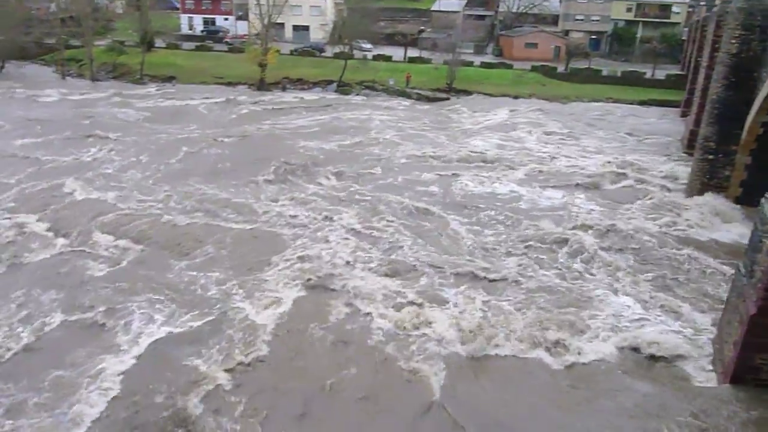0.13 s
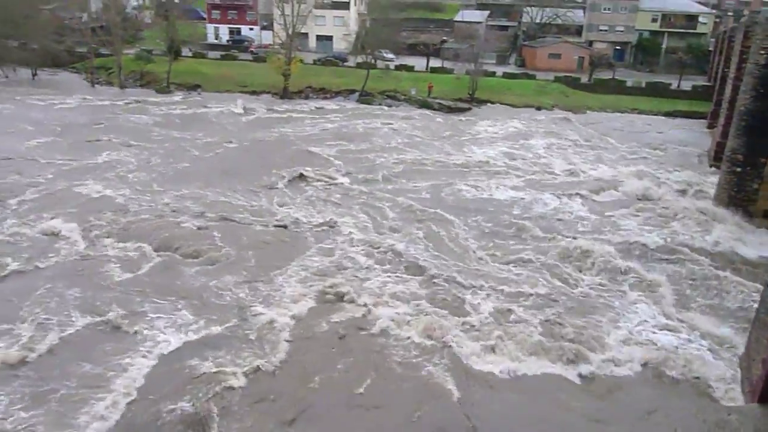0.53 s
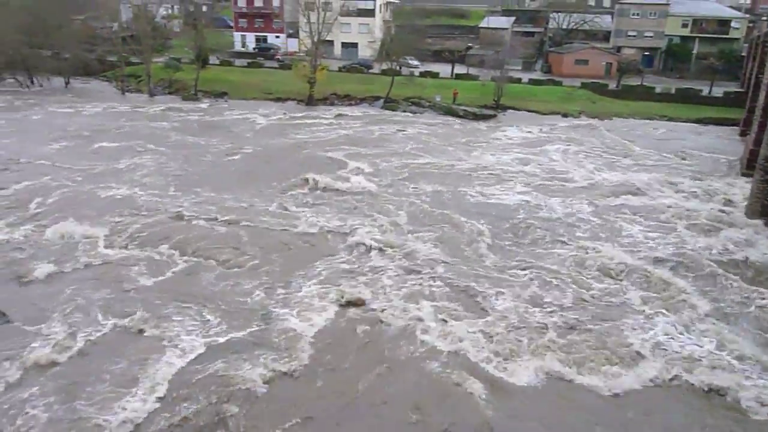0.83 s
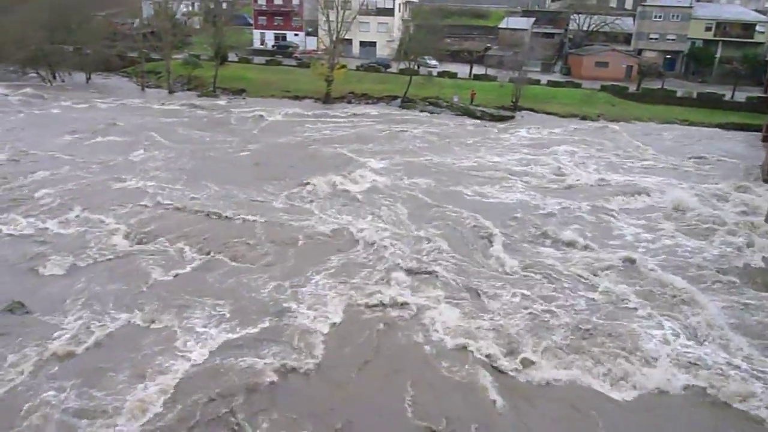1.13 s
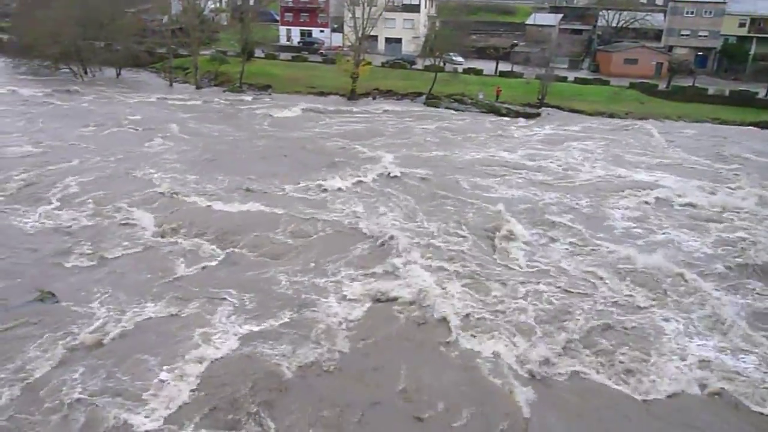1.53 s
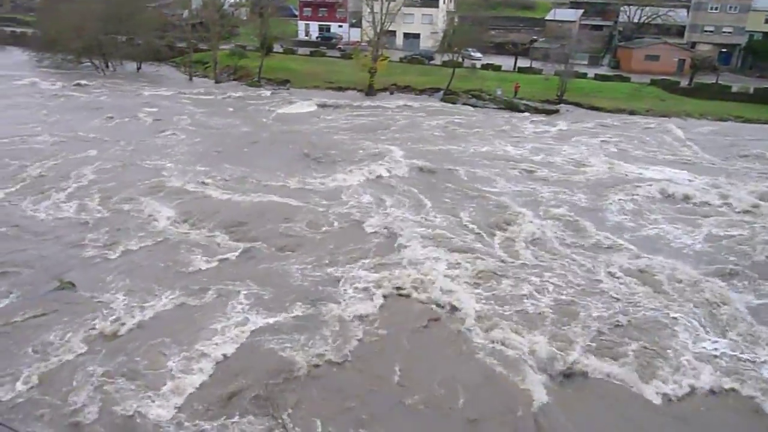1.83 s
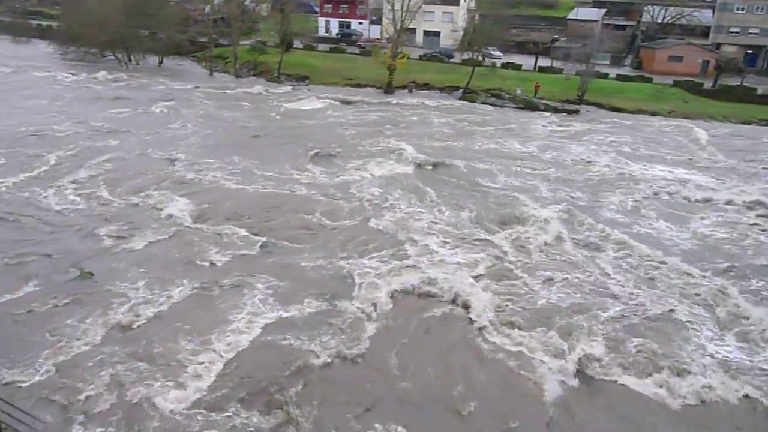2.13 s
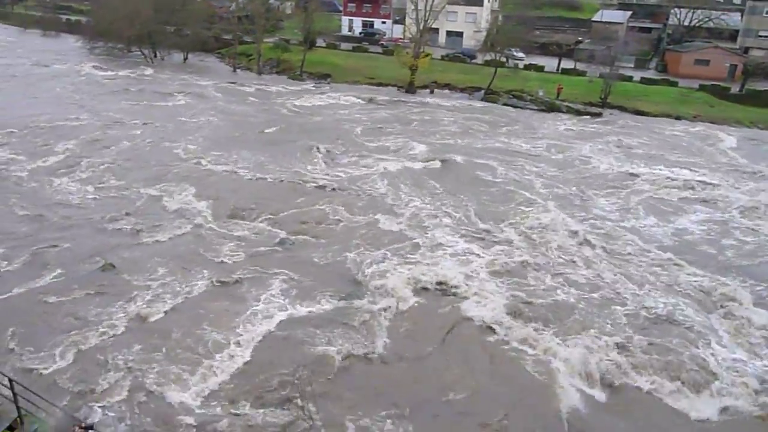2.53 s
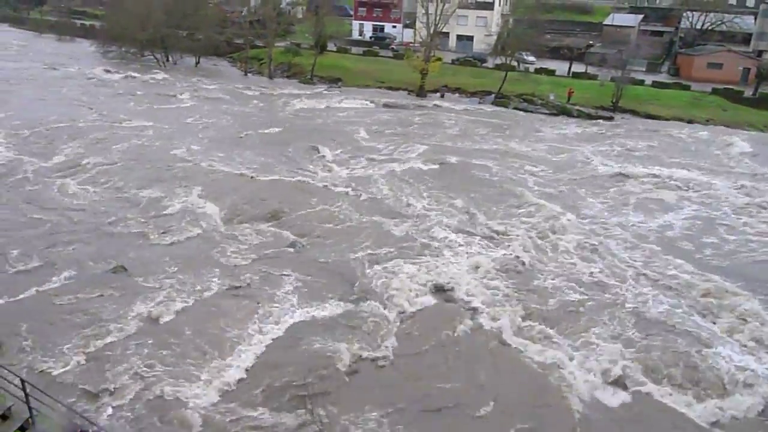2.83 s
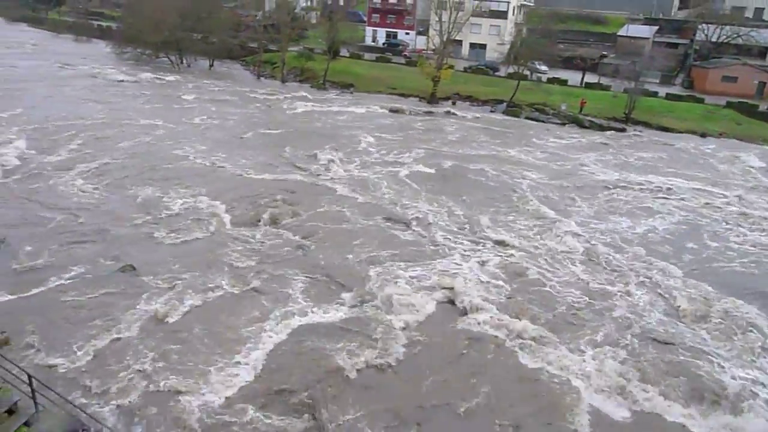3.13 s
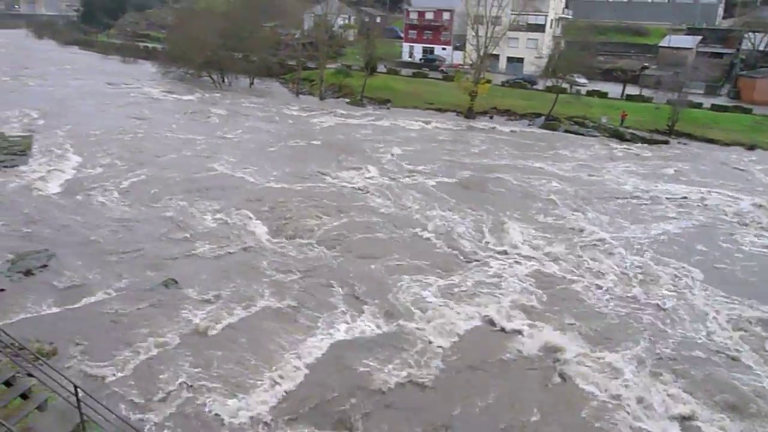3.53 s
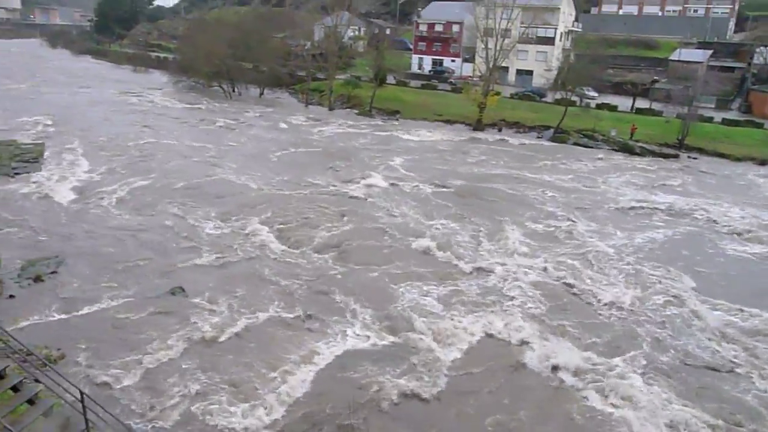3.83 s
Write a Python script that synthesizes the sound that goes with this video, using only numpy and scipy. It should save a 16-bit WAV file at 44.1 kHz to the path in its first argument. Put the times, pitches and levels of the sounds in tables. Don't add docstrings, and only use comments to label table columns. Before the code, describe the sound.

Wind buffets a bare microphone above a flooded river. Short bright rasps and thumps scatter through 0-0.3 s, another cluster hits at 0.55-0.7 s, then sparse, weaker puffs leave the steady distant water hiss exposed until about 2.3 s. Gusts then thicken, thudding and crackling, and from 3.2 s grow strong and nearly continuous, loudest at 3.5-4 s, with rounded peaks and muffled highs.

```python
import sys
import numpy as np
from scipy import signal
from scipy.fft import rfft, irfft, next_fast_len
from scipy.io import wavfile
from scipy.ndimage import uniform_filter1d, map_coordinates

SR = 44100
rng = np.random.default_rng(int(sys.argv[2]) if len(sys.argv) > 2 else 0)


def file_out(sig):
    cols = np.atleast_2d(sig).T
    lim = np.clip(cols, -1, 1)
    pcm = np.round(lim * 32767).astype(np.int16)
    wavfile.write(sys.argv[1], SR, pcm)


def natural_amplitude(level_db):
    exponent = np.asarray(level_db, float) / 20
    return 10 ** exponent


N = 176400

# time in seconds, strength in dB.
BREEZE = [(0, -38.5), (.2, -38), (.33, -46.5), (.52, -53), (.75, -48), (.95, -53), (1.12, -47),
          (1.33, -58.5), (1.52, -52.5), (1.75, -48), (2.0, -49.5), (2.17, -47.5), (2.3, -37.5), (2.6, -36),
          (3.0, -39.5), (3.2, -38.5), (3.55, -25.5), (4.0, -22.5)]
# start in seconds, peak in
# dB, length in seconds, brightness in dB.
GUSTS = [(.002, -17, 0.01, -8), (.03, -33, 0.01, -3), (.06, -32, 0.011, -9),
         (0.101, -25.5, 0.028, 13), (0.127, -15, 0.0067, 12), (0.145, -19, 0.014, 9),
         (0.167, -24.5, 0.033, 12.5), (0.228, -24, .008, 5), (0.246, -23.5, 0.027, 4),
         (0.288, -28.5, 0.016, -10), (0.543, -19, 0.029, 1), (0.56, -20.5, 0.014, 4),
         (0.571, -16.5, 0.03, -8.5), (0.6, -19.5, .02, 8), (0.664, -20.5, 0.027, 4),
         (0.706, -27, 0.034, 8.5), (0.765, -34, .01, -8), (0.886, -35, .015, -1),
         (1.063, -29, 0.013, 2), (1.084, -35, 0.057, -9), (1.214, -37.5, 0.067, 6),
         (1.535, -32.5, 0.026, -13), (1.616, -27.5, 0.029, -14), (1.639, -22.5, 0.027, 6.5),
         (1.666, -27, 0.013, 0), (1.71, -34, 0.055, 2), (1.862, -33, .02, -6),
         (1.9, -21.5, 0.0059, -1), (2.089, -35.5, 0.031, -1),
         (2.297, -26.5, 0.0092, 6.5), (2.324, -38, 0.021, 14.5), (2.411, -19, 0.013, -13),
                (2.447, -24, 0.025, 5), (2.463, -20, 0.013, 5), (2.48, -22, 0.038, 2.5),
                (2.55, -24.5, 0.014, 5), (2.591, -21, 0.0087, -0.5), (2.622, -22, 0.0063, 3),
                (2.678, -22.5, 0.02, 0), (2.709, -20, 0.02, 4), (2.752, -27.5, 0.049, 9),
                (2.837, -14, .014, 4), (2.878, -20.5, 0.035, -1), (2.922, -15.5, 0.0099, 3.5),
                (2.952, -17, 0.025, -7.5), (3.018, -17, .025, -9), (3.147, -18, .007, 2),
                (3.184, -19.5, 0.021, -1.5),
         (3.236, -17, 0.0098, 3.5), (3.269, -17.5, 0.025, 3.5), (3.298, -16, 0.045, 1),
                (3.354, -17.5, 0.035, 3.5), (3.424, -14.5, 0.019, -1), (3.478, -17.5, .012, 5.5),
                (3.497, -17, 0.012, 5), (3.514, -15, 0.019, 6), (3.55, -12, .03, 1),
                (3.584, -10.5, 0.031, -0.5), (3.635, -16.5, 0.04, 4), (3.682, -19, .006, 8),
                (3.712, -19.5, 0.014, 0), (3.729, -16.5, .04, 7.5), (3.78, -13, 0.0079, 0.5),
                (3.821, -14, 0.031, 7), (3.865, -14.5, 0.018, 9), (3.92, -14, .008, 5),
                (3.956, -22, 0.017, 3), (3.976, -8.5, 0.0068, -5.5)]
# frequency in Hz, level in dB per Hz.
THUMP_TONE = [(30, -41.5), (70, -12), (120, -2), (250, 3), (450, -2), (800, -15), (1600, -29.5),
              (4000, -65)]
RASP_TONE = [(100, -40.5), (300, -3), (600, -0.5), (1200, -6.5), (2500, -19), (5000, -48), (8000, -53)]
CRACKLE_TONE = [(500, -32.5), (1200, -0.5), (2200, 5), (4000, -7), (7500, -26.5)]
# frequency in Hz, level in dB per Hz.
RUMBLE_TONE = [(20, -14), (40, -8.5), (80, 7), (140, 3), (250, -37)]
# frequency in Hz, level in dB per Hz.
WATER_TONE = [(25, -27), (70, -10.5), (150, -3), (300, -4), (800, 0.5), (1500, -5.5), (3800, -9.5),
              (8000, -19)]
# frequency in Hz, gain in dB.
BAND_EDGE = [(6800, 0), (7250, -9), (7450, -32), (7650, -14), (8050, -42), (8350, -24), (8600, -42),
             (8750, -28), (9100, -70)]


def unit(x):
    return x / np.sqrt(np.mean(x ** 2) + 1e-20)


def wobble(rate):
    knots = rng.standard_normal(int(N * rate / SR) + 4)
    return map_coordinates(knots, [np.arange(N) * rate / SR])


def coloured(x, points):
    m = next_fast_len(N + 8192)
    hz, db = np.transpose(points)
    gain = natural_amplitude(np.interp(np.log(np.fft.rfftfreq(m, 1 / SR) + 1), np.log(hz + 1), db))
    return irfft(rfft(x, m) * gain, m)[..., :N]


def patchy(depth_db):
    z = signal.stft(rng.standard_normal(N), nperseg=512)[2]
    field = uniform_filter1d(rng.standard_normal(z.shape), size=6, axis=0)
    field = uniform_filter1d(field, size=10, axis=1)
    noise = signal.istft(z * natural_amplitude(depth_db * unit(field)), nperseg=512)[1]
    return unit(noise[:N])


def spikes(rate, spread_db):
    chance, side, size = rng.random((3, N))
    hit = chance < rate / SR
    return unit(hit * np.sign(side - .5) * natural_amplitude(-spread_db * np.log(size + 1e-4)))


def river():
    level_db, spray_db, spray_per_s, spray_hz = -47.5, -13, 2800, 2500
    rush = unit(coloured(patchy(0.82), WATER_TONE))
    spray_tone = [(spray_hz / 5, -25), (spray_hz, 0), (spray_hz * 3, -14)]
    spray = unit(coloured(spikes(spray_per_s, 2.5), spray_tone))
    surge_db = 0.24 * wobble(3.9) + 0.17 * wobble(10)
    return natural_amplitude(level_db + surge_db) * (rush + natural_amplitude(spray_db) * spray)


def wind_power():
    attack_s, release_s, peak_to_rms_db = 0.0051, 0.015, -12
    front_db, front_s = 3, 0.0087
    t = np.arange(N) / SR
    breeze = natural_amplitude(np.interp(t, *np.transpose(BREEZE)))
    power = breeze ** 2
    bright = (breeze * natural_amplitude(-4)) ** 2
    for start, peak_db, length, bright_db in GUSTS:
        near = slice(max(round((start - .03) * SR), 0), round((start + .25) * SR))
        u = t[near] - start
        rise = (np.minimum(u - attack_s, 0) / attack_s) ** 2
        fall = np.maximum(u - length, 0) / release_s
        shape = np.exp(-rise - fall)
        rms_db = peak_db + peak_to_rms_db
        edge_db = front_db * np.exp(-np.abs(u - attack_s) / front_s)
        power[near] += (natural_amplitude(rms_db) * shape) ** 2
        bright[near] += (natural_amplitude(rms_db + bright_db + edge_db) * shape) ** 2
    return power, bright


def eddy_stream(eddies, points, place):
    eddy_share, even_s, evenness = .4, .02, .65
    x = np.sqrt(eddy_share) * eddies + np.sqrt(1 - eddy_share) * patchy(1.9)
    x = unit(coloured(x, points))
    x = map_coordinates(x, [place], order=1, mode="wrap")
    local_power = np.abs(uniform_filter1d(x ** 2, size=round(even_s * SR)))
    return unit(x / (local_power + 0.064) ** (evenness / 2))


def rumble(power, loud):
    smooth_s, growth = 0.027, 0.72
    slow = np.sqrt(np.abs(uniform_filter1d(power, size=round(smooth_s * SR))))
    level = natural_amplitude(-16.5 + 4.6 * wobble(7.5)) * loud * (slow / loud) ** growth
    return level * unit(coloured(patchy(2.3), RUMBLE_TONE))


def crackle(rasp, loud):
    growth, snaps_per_s = 1.6, 600
    tiny = unit(coloured(spikes(snaps_per_s, 3.8) + 0.83 * patchy(1.1), CRACKLE_TONE))
    return natural_amplitude(-28.5) * loud * (rasp / loud) ** growth * tiny


def wind():
    loud = natural_amplitude(-30)
    rasp_db, rasp_growth, trade = -9, 1.226, 0.1
    speed_swing, speed_per_s = .25, 220
    power, bright = wind_power()
    strength = np.sqrt(power)

    hurry = wobble(speed_per_s)
    place = np.cumsum(np.exp(speed_swing * hurry - speed_swing ** 2 / 2))
    eddies = spikes(700, 2.5)
    big = eddy_stream(eddies, THUMP_TONE, place)
    small = eddy_stream(eddies, RASP_TONE, place)

    thump = strength * (power / (power + bright)) ** trade
    rasp = np.sqrt(bright) * (strength / loud) ** (rasp_growth - 1)
    low = rumble(power, loud)
    flow = crackle(rasp, loud) + thump * big + natural_amplitude(rasp_db + 0.91 * hurry) * rasp * small
    return natural_amplitude(1.04 * wobble(60)) * flow + low


def scene():
    return (river() + wind())[None]


def low_pass(x):
    return signal.sosfilt(signal.butter(12, 9000, fs=SR, output="sos"), x)


def record(dry):
    ceiling, knee = .4, 3
    held = dry / (1 + np.abs(dry / ceiling) ** knee) ** (1 / knee)
    return low_pass(coloured(held, BAND_EDGE))


dry = scene()
out = record(dry)
file_out(out)
```